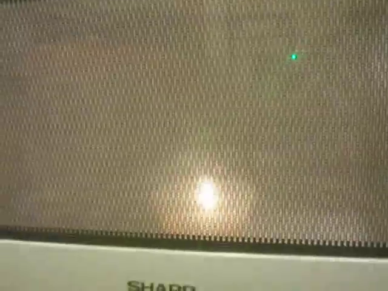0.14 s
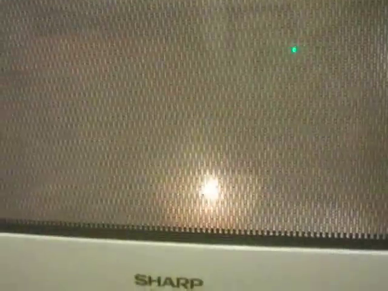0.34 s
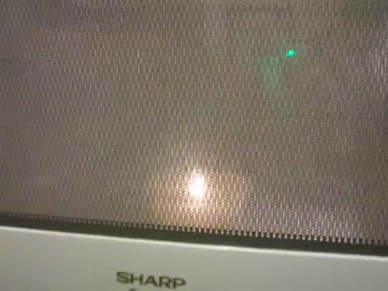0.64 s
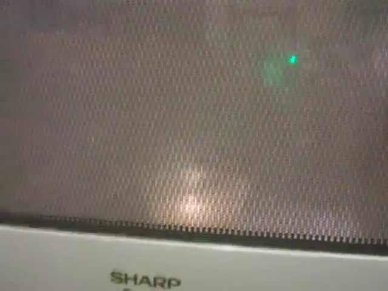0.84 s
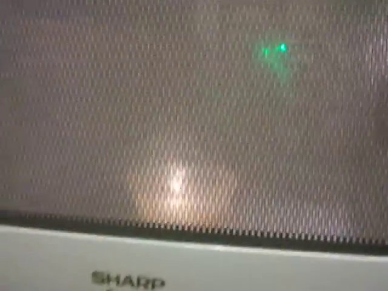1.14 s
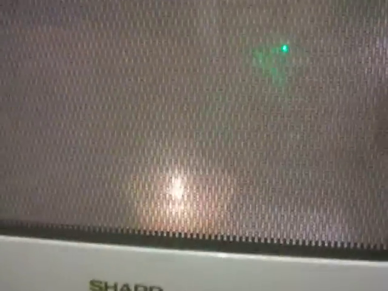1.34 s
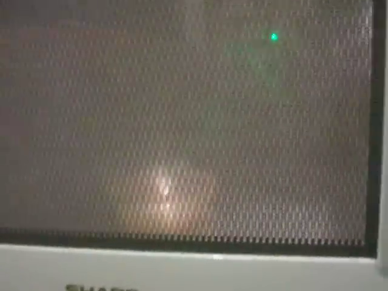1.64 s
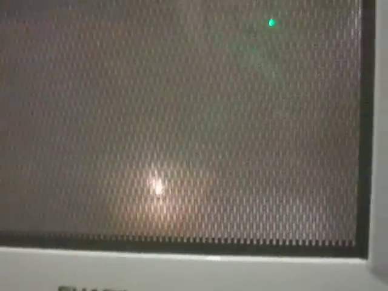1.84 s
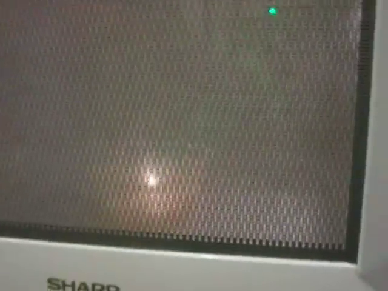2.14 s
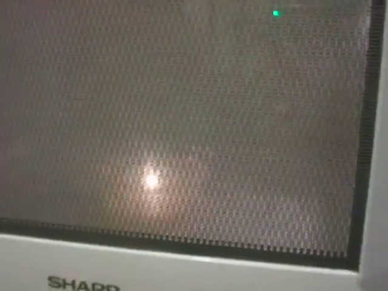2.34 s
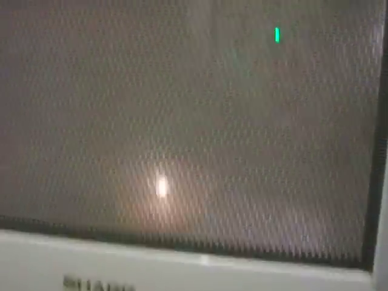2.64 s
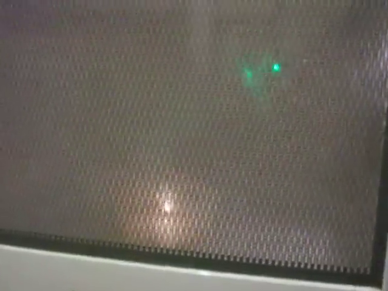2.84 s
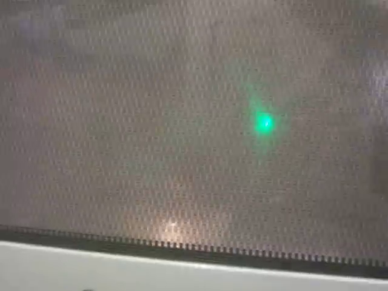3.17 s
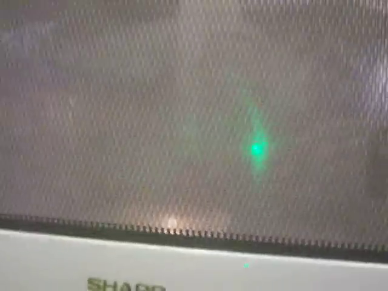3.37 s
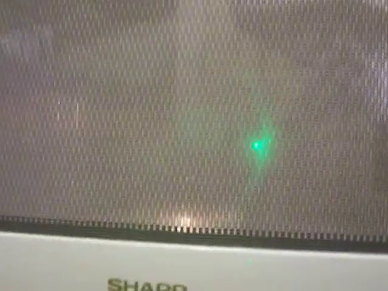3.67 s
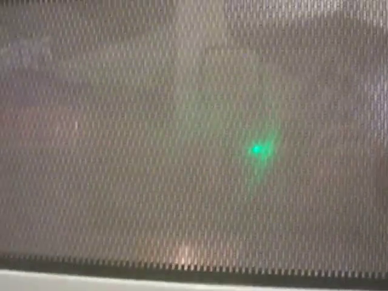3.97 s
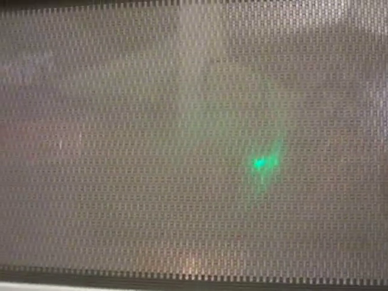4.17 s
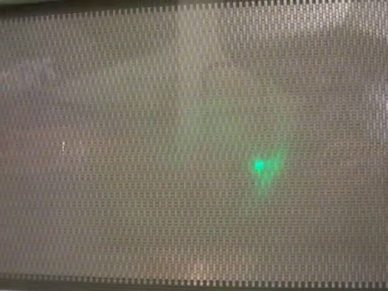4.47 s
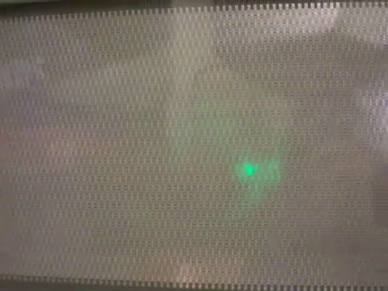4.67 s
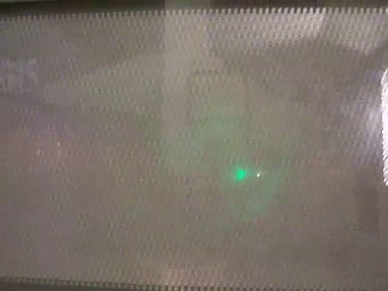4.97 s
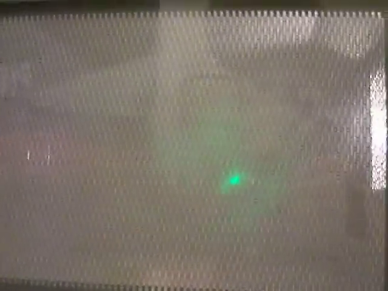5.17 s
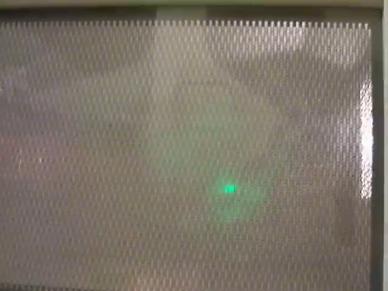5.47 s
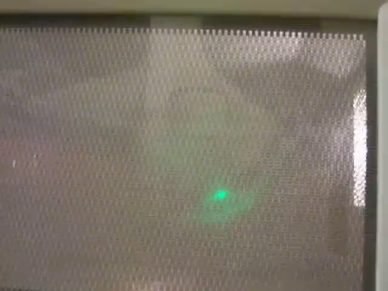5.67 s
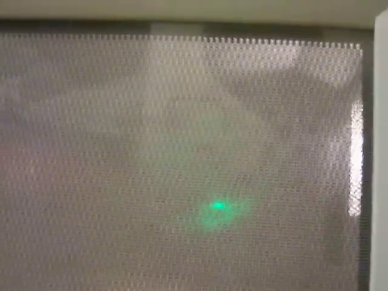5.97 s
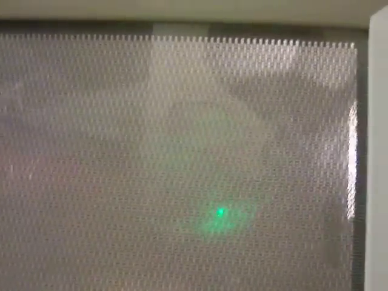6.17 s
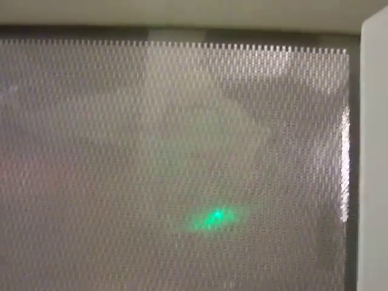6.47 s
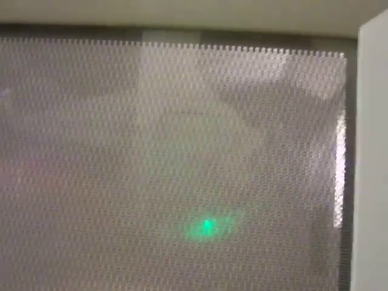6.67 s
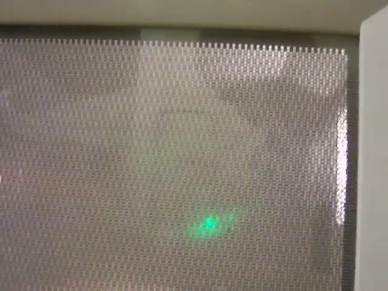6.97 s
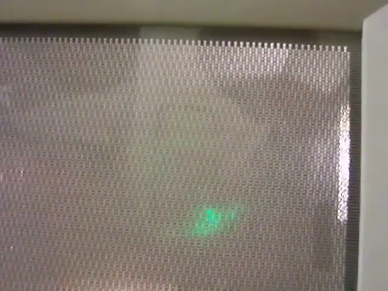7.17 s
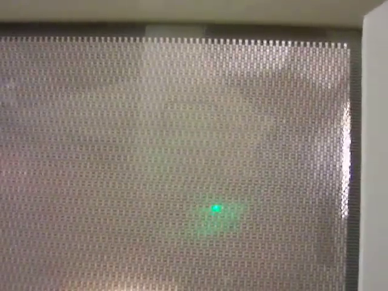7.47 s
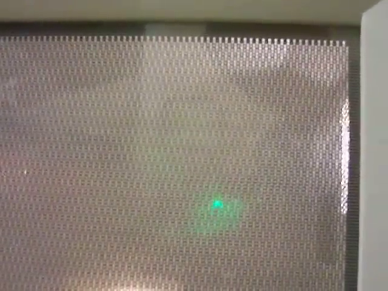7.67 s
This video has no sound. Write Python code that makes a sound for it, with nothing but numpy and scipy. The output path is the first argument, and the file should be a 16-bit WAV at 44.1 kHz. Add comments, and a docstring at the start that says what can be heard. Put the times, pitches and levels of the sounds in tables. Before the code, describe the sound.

After a brief silence, a running microwave cuts in abruptly: low electrical hum, fan whirr and rushing air. Sharp plastic ticks come early, then a soft thud as the hum grows stronger and the fan slows slightly. The steady drone continues with faint brushes and a couple of dull finger taps. Close handheld microphone, small home kitchen, dull top end.

```python
"""A microwave oven runs in a home kitchen, heard from a hand-held camera close to its door.
After a brief silence the microphone opens on transformer hum (mains multiples), fan tones (shaft
multiples and sums with the mains) and rushing air (noise shaped by cavity resonances). At 1.72 s the
magnetron strikes: a thud, the hum deepens, the fan slows. At 3.32 s the camera is lifted and the balance
shifts. Throughout, fingers add ticks and taps (damped modes), brushes and bumps (noise bursts)."""
import sys
import numpy as np
from scipy import signal
from scipy.io import wavfile

SR = 44100
rng = np.random.default_rng(int(sys.argv[2]) if len(sys.argv) > 2 else 0)


def dump_mix(stems):
    """Bounce the given channels to the path in sys.argv[1] as a 16-bit WAV at rate SR."""
    frames = np.atleast_2d(stems).T  # one column per channel
    limited = np.clip(frames, -1, 1)  # hard clip at full scale
    pcm = np.round(limited * 32767).astype(np.int16)
    wavfile.write(sys.argv[1], SR, pcm)


N = 344862

# Spectrum of the cooling air before it is scaled to its level: pitch_hz, relative_density_db
AIR_SPECTRUM = [(20, -19.5), (45, -4), (110, -4), (170, 0.5), (280, -0.5), (420, -5.5), (800, -7.5),
                (1500, -14.5), (2300, -14), (3100, -19), (4500, -26.5), (7000, -32), (7900, -41),
                (9200, -40)]
# Standing waves in the cavity and ducts: pitch_hz, width_hz, gain_db
CAVITY_MODES = [(123.5, 15, 6), (326, 20, -4.5), (344, 36, 4), (742, 40, -4), (898, 95, 2.5),
                (1036, 50, 3.5), (1184, 26, 4), (1298, 37, 2.5), (1460, 30, 2.5), (1995, 11, 6.5),
                (2054, 25, 4.5), (2096, 20, 8), (2129, 25, 6.5), (2230, 30, 2), (2353, 40, 7.5)]
# Low handling rumble: start_s, level_db (rms before the envelope), length_s
HANDLING_BUMPS = [(0.758, -34, .17), (3.384, -35, .12), (5.543, -43, 0.27)]
# Skin brushing the shell: start_s, level_db (rms before the envelope), length_s, lowest_hz
SKIN_BRUSHES = [(0.54, -42, 0.003, 4000), (.788, -32.5, 0.0035, 5000), (1.417, -48.5, 0.27, 4000),
                (3.426, -31, 0.014, 1000), (4.458, -41, 0.0045, 3000), (4.812, -44, 0.0057, 4000),
                (5.565, -40, 0.0041, 2000), (5.662, -39, 0.0033, 3500), (5.668, -35, .012, 3500),
                (5.883, -41, 0.0031, 4500), (7.561, -39, 0.0048, 5300)]
# Dull fingertip taps: start_s, strike_level_db, pitch_hz
FINGER_TAPS = [(4.746, -14.5, 1550), (7.5125, -21.5, 1800)]
# Hard ticks on the camera body: start_s, strike_level_db (before each mode's level), contacts (count)
BODY_TICKS = [(.6059, -19.5, 3), (.6883, -9, 1), (.6902, -22.5, 1)]
# Modes of the plastic camera shell: pitch_hz, level_db, t60_s
SHELL_MODES = [(2630, -22, .005), (3270, 4, 0.0059), (4500, 0, 0.0033), (5300, -1, 0.0041),
               (6300, -6, 0.0022), (7260, -14, .002)]
# Fan motor tones: mains_multiple, shaft_multiple (added to it), warming_db, cooking_db (both rms)
FAN_TONES = [(0, 1, -52, -45), (0, 3, -37, -43), (0, 4, -38, -40), (0, 6, -54, -52), (0, 8, -52, -50),
             (0, 18, -59, -52), (2, 1, -50, -42), (2, 2, -44, -46), (2, 7, -52, -52), (3, -1, -53, -50),
             (4, -1, -51, -47), (6, 3, -47, -49), (6, 4, -53, -50), (10, 4, -56, -54)]
# Transformer hum: mains_multiple, warming_db, cooking_db, lifted_db (cooking after the lift; all rms)
HUM_TONES = [(.5, -57, -57, -57), (1, -45, -43, -41), (2, -50, -51, -43), (3, -37, -30, -31),
             (4, -34, -29, -30), (5, -54, -46, -44), (6, -38, -43, -40), (7, -58, -48, -54),
             (8, -39, -36, -40), (10, -40, -48, -52), (12, -62, -52, -54)]

STRIKE_S, STRIKE_RISE_S = 1.72, 0.016   # the magnetron starts to draw power
LIFT_S, LIFT_RISE_S = 3.32, 0.3   # the camera is lifted along the door
AIR_DB, AIR_LIFTED_DB = -31, -31.5   # rms before and after the lift
AIR_FLICKER_DB = 0.87
KITCHEN_T60_S, KITCHEN_DB = 0.12, -9.0
BUMP_HZ = 41.4   # top of the rumble band, which spans one octave
BRUSH_TOP_HZ = 6940
CREAKS_PER_S, CREAK_DB, CREAK_S, CREAK_HZ = 0.8, -47, 0.0077, 6000   # highest level, lowest frequency
TAP_T60_S = 0.0091
REBOUND_S, REBOUND_LOSS_DB = 0.0008, 3   # mean spacing and loss of further contacts
MAINS_HZ = 60.005
FAN_WARMUP_HZ, FAN_LOADED_HZ = 51.85, 50.82
FAN_SAG_S, FAN_WANDER_HZ = 0.334, 0.041
WAVER_DB = -0.1   # slow level wander of every tone
SURGE_DB, SURGE_S = -28.5, 0.07   # rms before the envelope, length
START_S, START_RISE_S = 0.2772, 0.00032   # the microphone opens
GAIN_THRESHOLD_DB, GAIN_SLOPE, GAIN_RELEASE_DB_S = -8, 0.31, 5.5   # slope: dB of cut per dB of excess
ROLLOFF_HZ, MIC_CUT_HZ, CUTOFF_HZ = 8050, 9250, 16500
OVERLOAD = 0.77   # amplitude limit


def from_db(db):
    """Decibel law: amplitude gain of a level in dB."""
    return 10 ** (np.asarray(db) / 20)


def rms_one(x):
    """Power normalization: scale to rms 1."""
    return x / np.sqrt(np.mean(x ** 2) + 1e-20)


def step(at_s, rise_s):
    """Linear transition from 0 to 1."""
    return np.clip((np.arange(N) / SR - at_s) / rise_s, 0, 1)


def drift(rate_hz):
    """Random fluctuation of spread 1: coarse noise smoothed by two equal one-pole low-passes."""
    spacing = 40   # samples between random values
    r = np.exp(-2 * np.pi * rate_hz * spacing / SR)
    noise = rng.standard_normal(N // spacing + 2002)
    slow = signal.lfilter([1], [1, -2 * r, r * r], noise)[2000:]   # settled part only
    return np.interp(np.arange(N) / spacing, np.arange(len(slow)), rms_one(slow))


def band_pass(low_hz, high_hz):
    """Band limitation: a Butterworth filter passing the range between two frequencies."""
    return signal.butter(2, [low_hz, high_hz], "band", fs=SR, output="sos")


def resonance(x, hz, width_hz, db):
    """Resonance or absorption: a two-pole, two-zero filter lifts or cuts a narrow band."""
    a = from_db(db / 2)
    w = 2 * np.pi * hz / SR
    half = np.pi * width_hz / SR
    zeros = [1 + half * a, -2 * np.cos(w), 1 - half * a]
    poles = [1 + half / a, -2 * np.cos(w), 1 - half / a]
    return signal.lfilter(zeros, poles, x)


def ring(clicks, hz, t60_s):
    """Impulse response of a damped mode: each unit click starts a decaying sine."""
    r = from_db(-60 / (t60_s * SR))
    w = 2 * np.pi * hz / SR
    return signal.lfilter([0, np.sin(w)], [1, -2 * r * np.cos(w), r * r], clicks + 1e-18)


def burst(at_s, level_db, length_s, filt):
    """Transient noise: a filtered random signal under a quick rise and slower fall."""
    out = np.zeros(N)
    at, size = round(at_s * SR), round(length_s * SR)
    noise = rms_one(signal.sosfilt(filt, rng.standard_normal(SR // 2)))[-size:]
    envelope = np.sin(np.pi * np.linspace(0, 1, size) ** 0.53)
    out[at:at + size] = from_db(level_db) * noise * envelope
    return out


def reflections(x, count=5):
    """Dense echoes off door, counter and walls comb the upper spectrum, shifting as the camera drifts."""
    decay = from_db(-60 * np.arange(SR // 4) / SR / KITCHEN_T60_S)
    decay = decay / np.sqrt(np.sum(decay ** 2))   # unit energy
    upper = band_pass(900, 5000)
    out = np.zeros(N)
    place = np.linspace(0, count - 1, N)
    for k in range(count):
        tail = signal.sosfilt(upper, rng.standard_normal(SR // 4) * decay)
        fade = np.cos(np.pi / 2 * np.clip(place - k, -1, 1))   # equal-power passage between tails
        out += fade * signal.fftconvolve(x, tail)[:N]
    return from_db(KITCHEN_DB) * out


def cooling_air():
    """Flow noise: flickering third-octave bands coloured by standing waves and reflections."""
    out = np.zeros(N)
    together = drift(4.0)   # flicker shared by all bands
    edges = 18 * 2 ** (np.arange(28) / 3)
    white = rng.standard_normal((2, N))   # neighbouring bands use different noise
    points = np.array(AIR_SPECTRUM)
    for k, (low, high) in enumerate(zip(edges, edges[1:])):
        band = signal.sosfilt(band_pass(low, high), white[k % 2])
        band_db = np.interp(np.log(low * high) / 2, np.log(points[:, 0]), points[:, 1])
        flicker_db = AIR_FLICKER_DB * (0.68 * together + drift(8.6))
        out += from_db(band_db + flicker_db) * band
    for hz, width_hz, db in CAVITY_MODES:
        out = resonance(out, hz, width_hz, db)
    out = out + reflections(out)
    level_db = AIR_DB + (AIR_LIFTED_DB - AIR_DB) * step(LIFT_S, LIFT_RISE_S)
    return rms_one(out) * from_db(level_db)


def bumps():
    """Low-frequency excitation: handling makes bursts of rumble."""
    rumble = band_pass(BUMP_HZ / 2, BUMP_HZ)
    return sum(burst(s, db, length_s, rumble) for s, db, length_s in HANDLING_BUMPS)


def brushes():
    """Friction noise: skin on the shell makes band noise, with fainter touches at random moments."""
    out = np.zeros(N)
    chance = rng.random((round(CREAKS_PER_S * N / SR), 2))
    creaks = [(when * (N / SR - 2 * CREAK_S), CREAK_DB - 6 * loss, CREAK_S, CREAK_HZ)
              for when, loss in chance]
    for s, db, length_s, lowest_hz in SKIN_BRUSHES + creaks:
        out += burst(s, db, length_s, band_pass(lowest_hz, BRUSH_TOP_HZ))
    return out


def taps():
    """Single-mode impact: each soft fingertip rings one damped note."""
    out = np.zeros(N)
    for s, db, hz in FINGER_TAPS:
        out += from_db(db) * ring(np.arange(N) == round(s * SR), hz, TAP_T60_S)
    return out


def ticks():
    """Modal superposition: each hard contact excites every mode of the plastic shell."""
    clicks, out = np.zeros(N), np.zeros(N)
    for s, db, contacts in BODY_TICKS:
        k = np.arange(contacts)
        contact_s = s + REBOUND_S * k * rng.uniform(0.8, 1.2, contacts)
        clicks[np.round(contact_s * SR).astype(int)] = from_db(db - REBOUND_LOSS_DB * k)
    for hz, level_db, t60_s in SHELL_MODES:
        out += from_db(level_db) * ring(clicks, hz, t60_s)
    # the shell is too small to push bass
    return signal.sosfilt(signal.butter(2, 1600, "high", fs=SR, output="sos"), out)


def tone(phase, level_db):
    """Simple harmonic motion: a sine of given rms level with random start phase and slight waver."""
    gain = np.sqrt(2) * from_db(level_db + WAVER_DB * drift(0.62))
    return gain * np.sin(phase + 2 * np.pi * rng.random())


def mains_phase():
    """Uniform rotation: phase of the steady mains cycle in radians."""
    return 2 * np.pi * MAINS_HZ * np.arange(N) / SR


def fan_motor():
    """Rotational modulation: shaft multiples and their sums with the mains from the uneven rotor."""
    strike = step(STRIKE_S, STRIKE_RISE_S)
    # the loaded supply sags, so the fan loses speed over a moment
    sag_hz = (FAN_LOADED_HZ - FAN_WARMUP_HZ) * step(STRIKE_S, FAN_SAG_S)
    fan_hz = FAN_WARMUP_HZ + sag_hz + FAN_WANDER_HZ * drift(0.4)
    mains, shaft = mains_phase(), 2 * np.pi * np.cumsum(fan_hz) / SR
    return sum(tone(m * mains + k * shaft, warm + strike * (cook - warm))
               for m, k, warm, cook in FAN_TONES)


def load_surge():
    """Impulsive loading: the case thuds as the transformer takes the load."""
    return burst(STRIKE_S, SURGE_DB, SURGE_S, band_pass(120, 200))


def transformer():
    """Harmonic synthesis: mains multiples change level at the strike and again at the lift."""
    strike, lift = step(STRIKE_S, STRIKE_RISE_S), step(LIFT_S, LIFT_RISE_S)
    mains = mains_phase()
    return sum(tone(m * mains, warm + strike * (cook - warm) + lift * (lifted - cook))
               for m, warm, cook, lifted in HUM_TONES)


def scene():
    """Linear superposition of oven and hand in one channel."""
    hand = bumps() + brushes() + taps() + ticks()
    oven = cooling_air() + fan_motor() + load_surge() + transformer()
    return (hand + oven)[None]


def record(dry):
    """Gain control and band limitation: loud peaks duck the level, recovery is slow, the top is cut."""
    ramp = GAIN_RELEASE_DB_S * np.arange(N) / SR
    excess_db = np.maximum(20 * np.log10(abs(dry) + 1e-9) - GAIN_THRESHOLD_DB, 0)
    # a running maximum on a tilted scale holds each duck and releases it steadily
    held_db = np.maximum.accumulate(GAIN_SLOPE * excess_db + ramp, axis=1) - ramp
    smooth_db = signal.lfilter([0.005], [1, -0.995], held_db)
    opened = dry * from_db(-smooth_db) * step(START_S, START_RISE_S)
    # the microphone path rolls off steeply
    wet = signal.sosfilt(signal.butter(16, ROLLOFF_HZ, fs=SR, output="sos"), opened)
    wet = signal.sosfilt(signal.cheby2(16, 50, MIC_CUT_HZ, fs=SR, output="sos"), wet)
    # flattening a peak splashes energy above the roll-off
    wet = np.clip(wet, -OVERLOAD, OVERLOAD)
    return signal.sosfilt(signal.cheby2(16, 50, CUTOFF_HZ, fs=SR, output="sos"), wet)


dry = scene()
out = record(dry)
dump_mix(out)
```